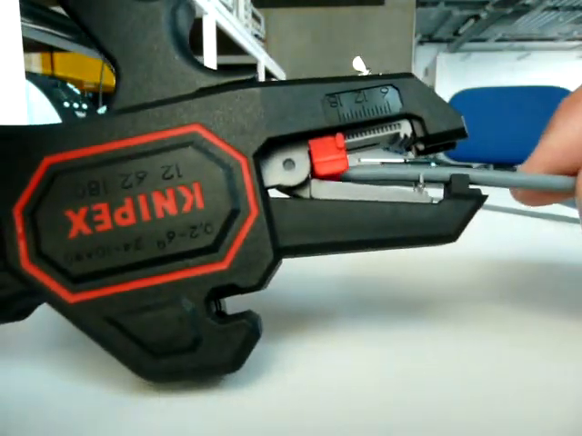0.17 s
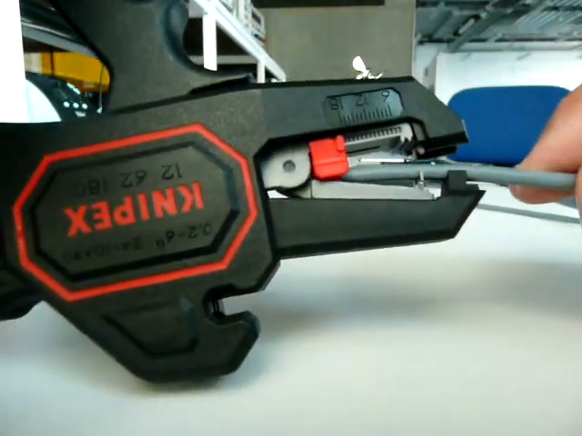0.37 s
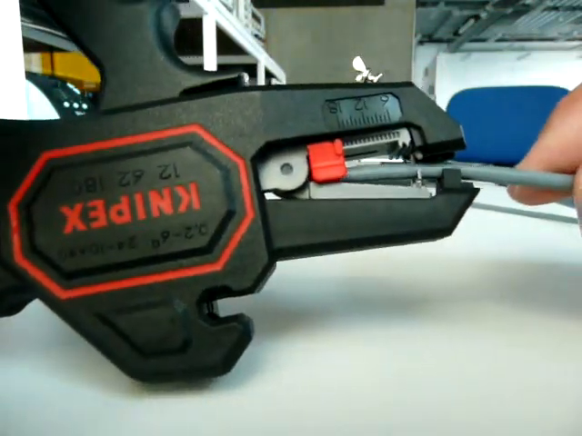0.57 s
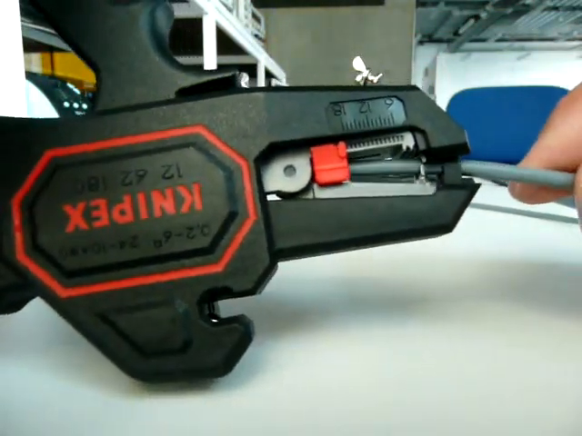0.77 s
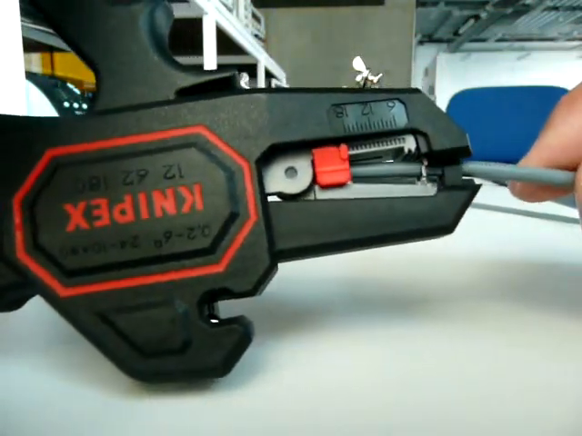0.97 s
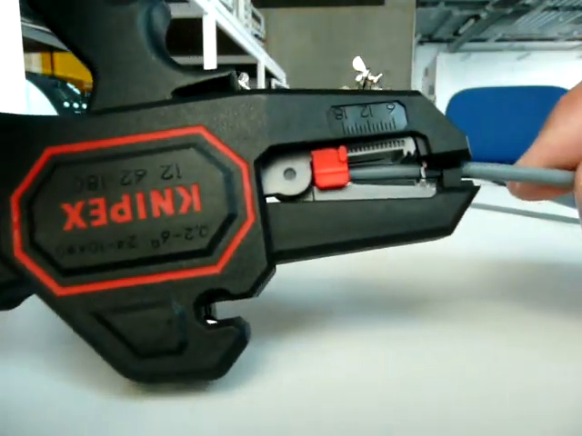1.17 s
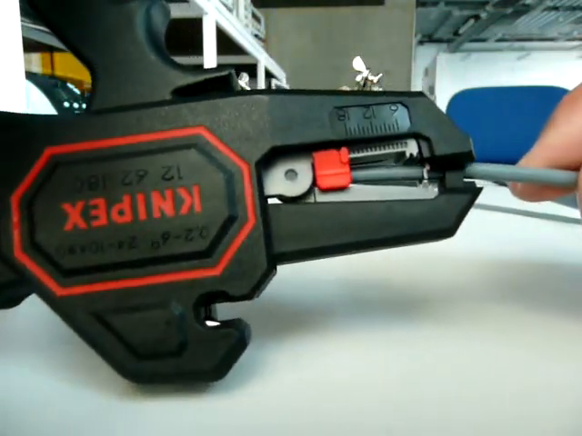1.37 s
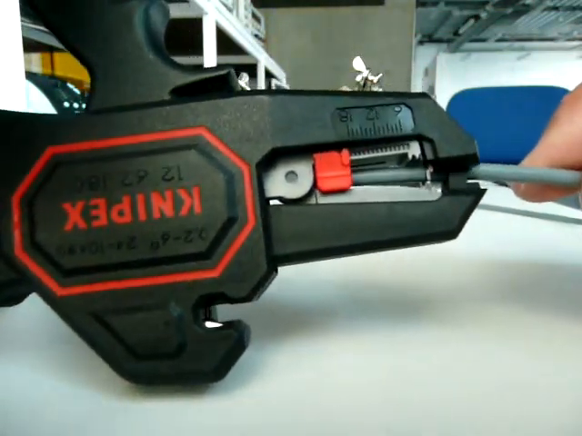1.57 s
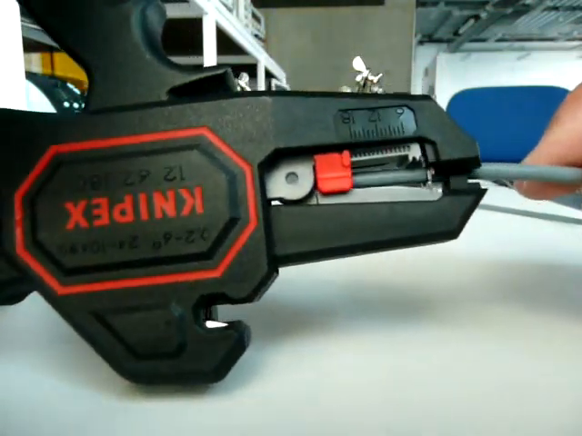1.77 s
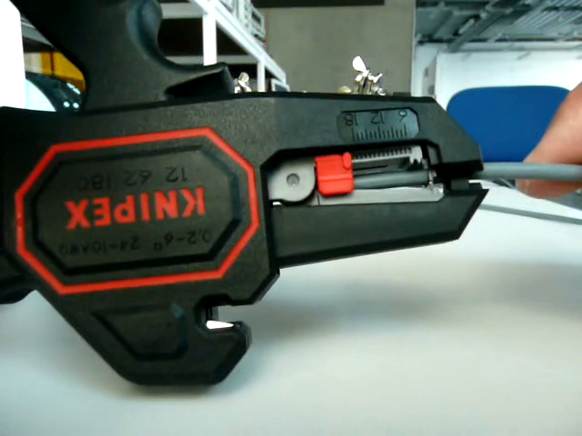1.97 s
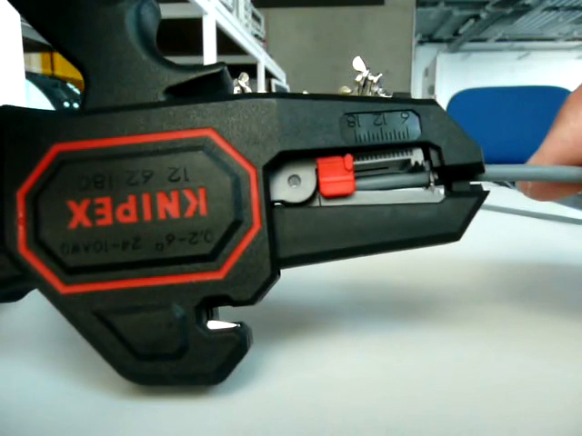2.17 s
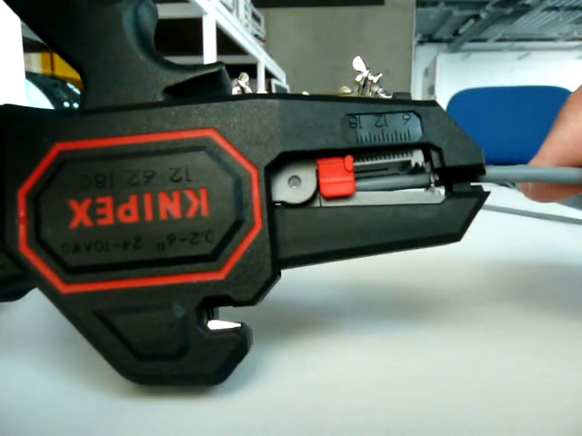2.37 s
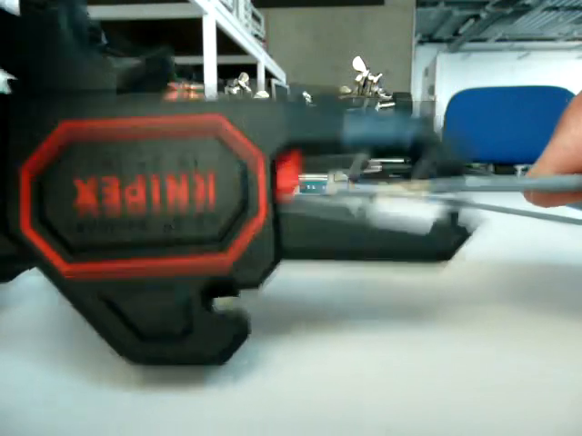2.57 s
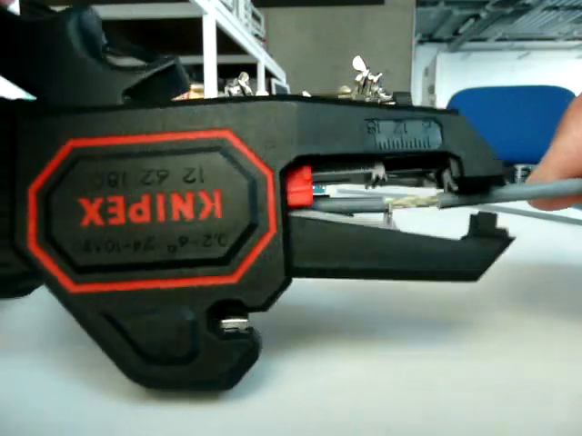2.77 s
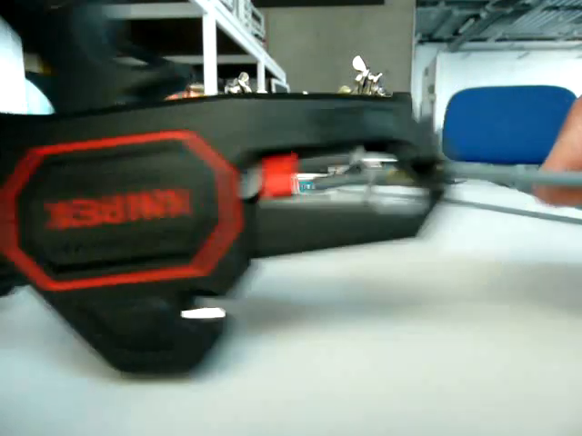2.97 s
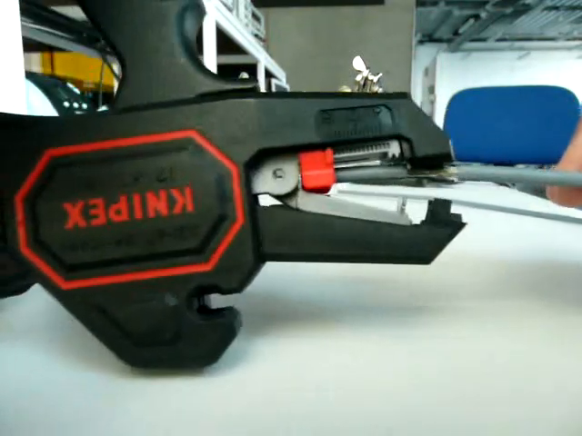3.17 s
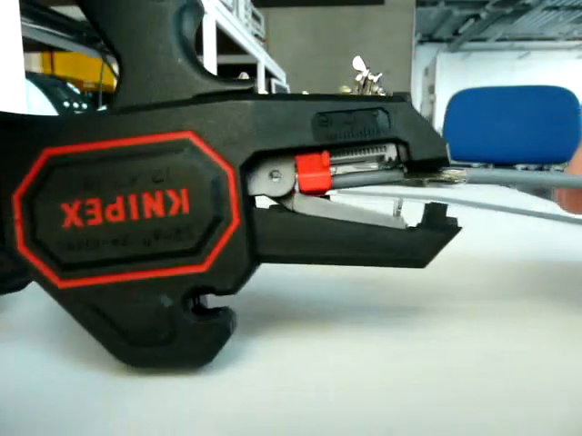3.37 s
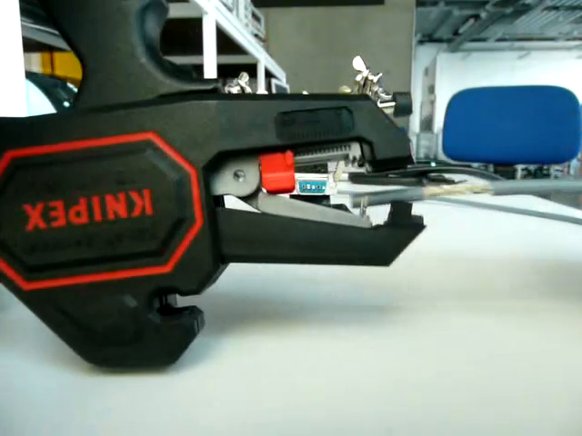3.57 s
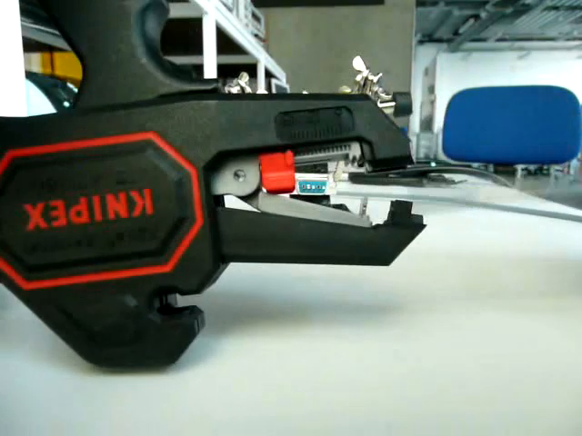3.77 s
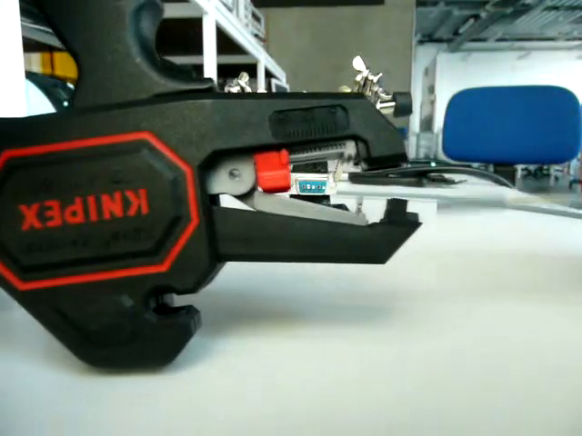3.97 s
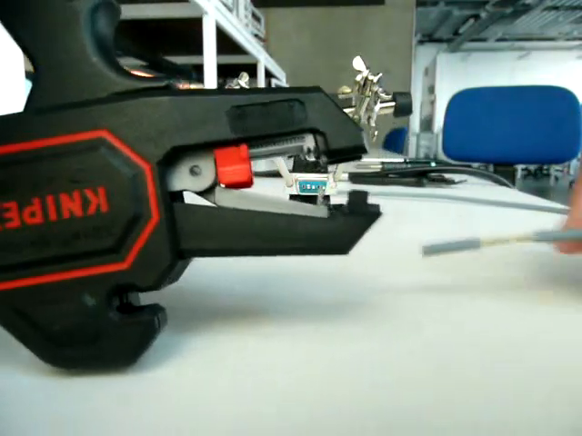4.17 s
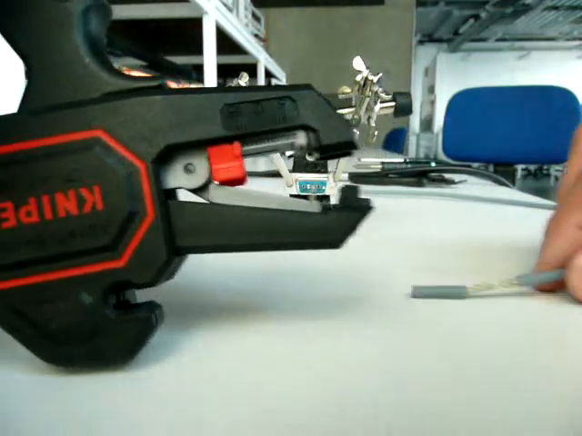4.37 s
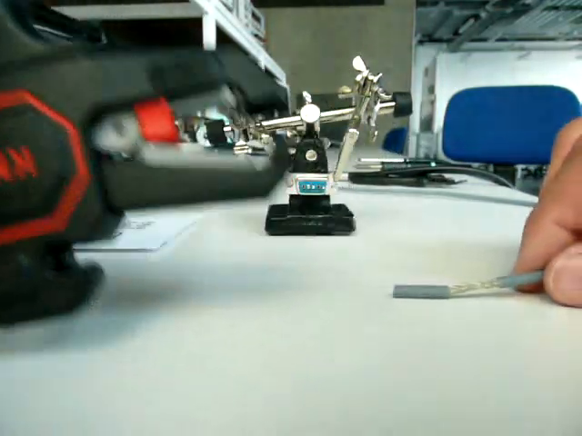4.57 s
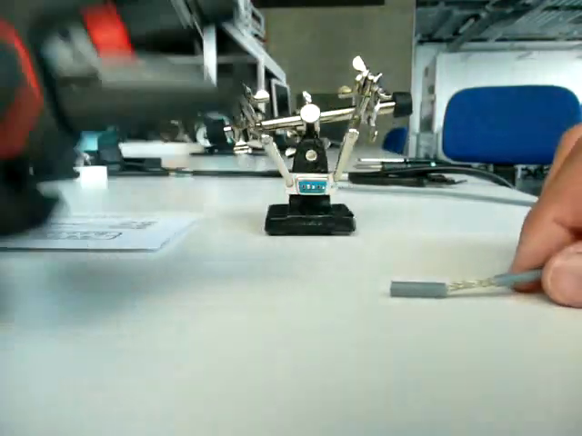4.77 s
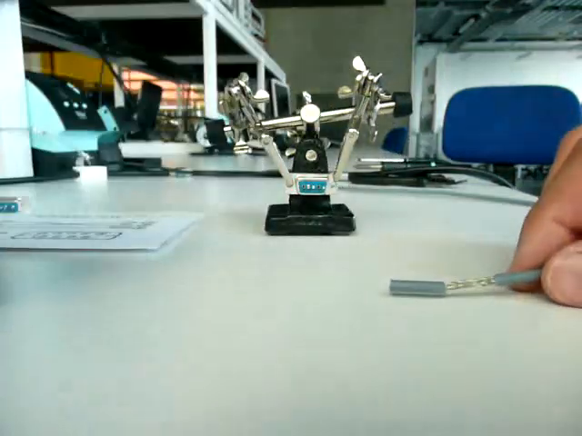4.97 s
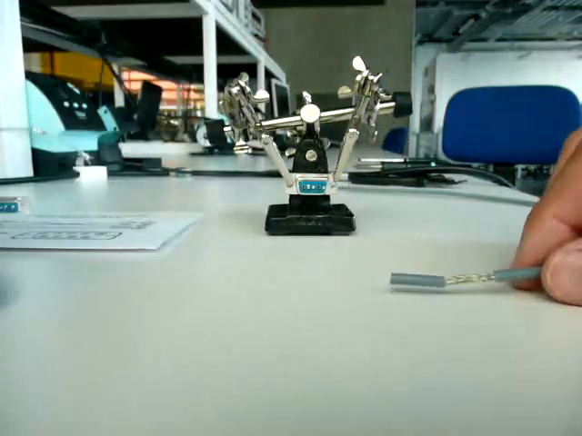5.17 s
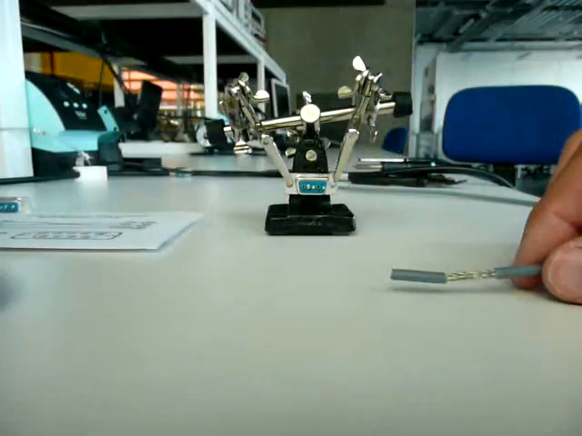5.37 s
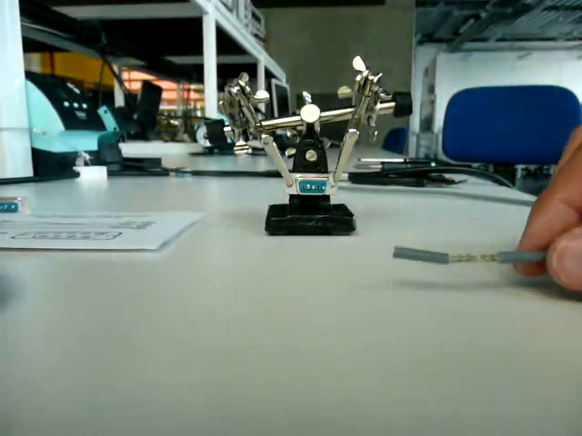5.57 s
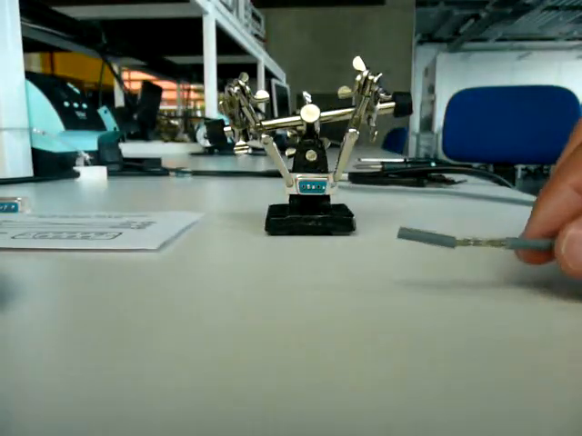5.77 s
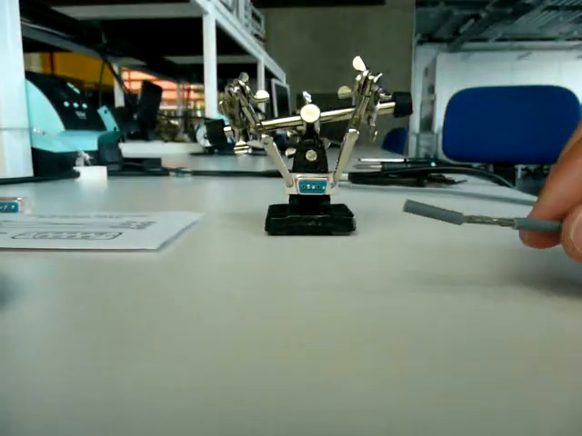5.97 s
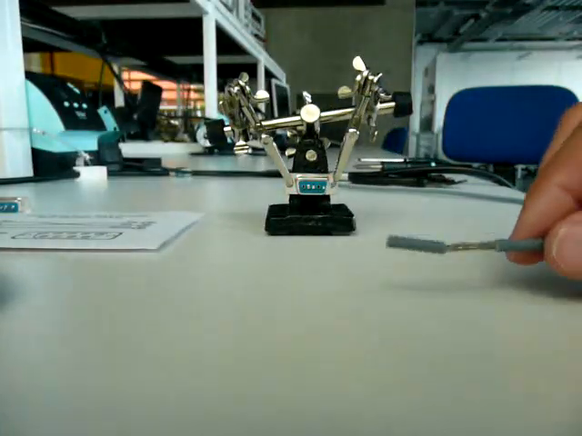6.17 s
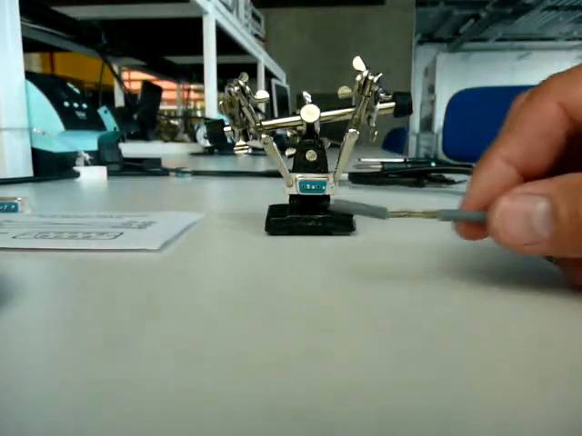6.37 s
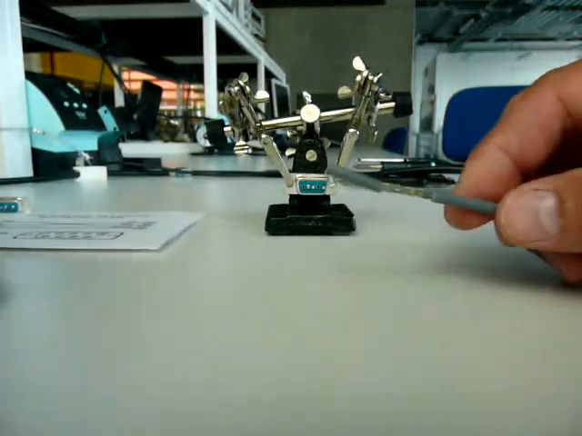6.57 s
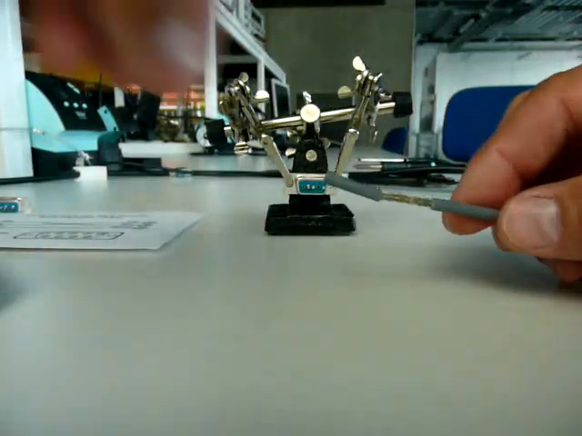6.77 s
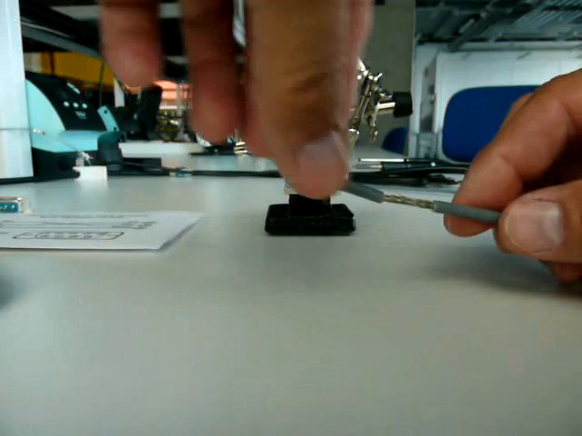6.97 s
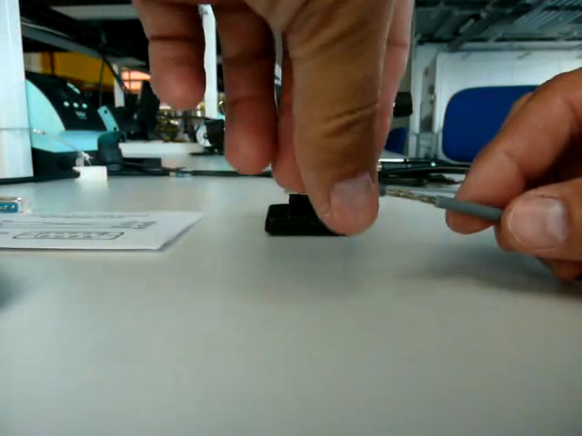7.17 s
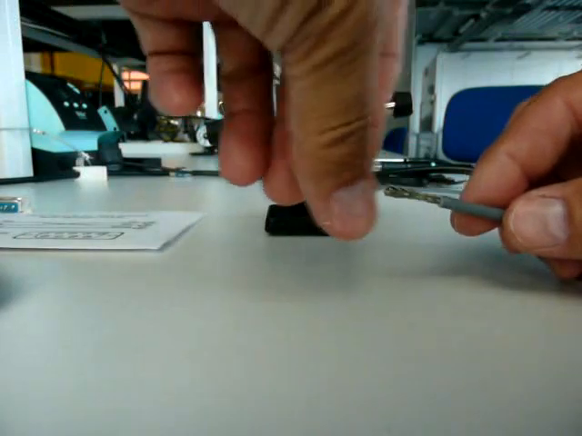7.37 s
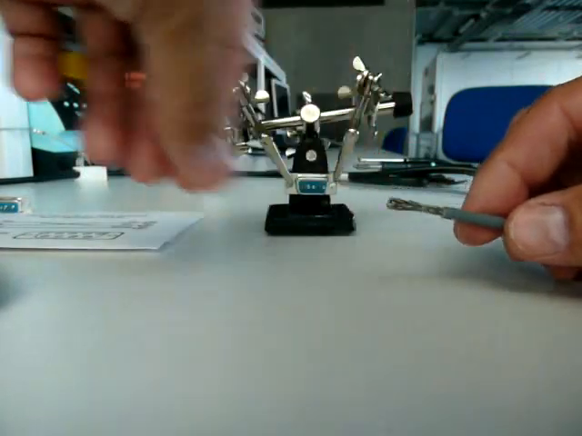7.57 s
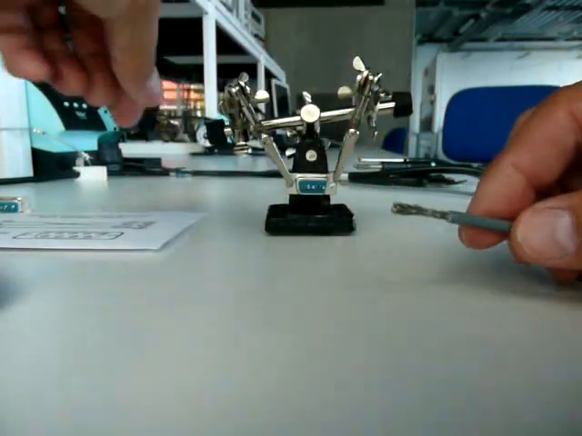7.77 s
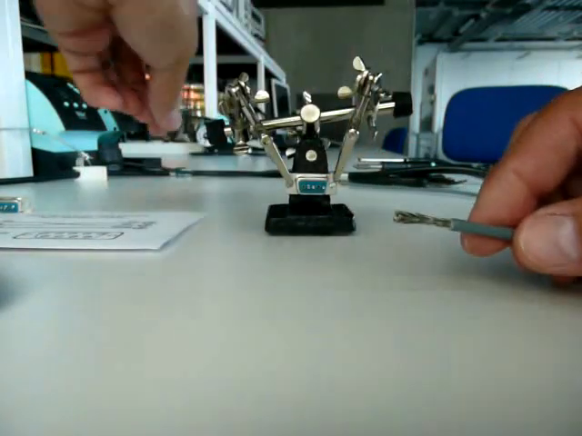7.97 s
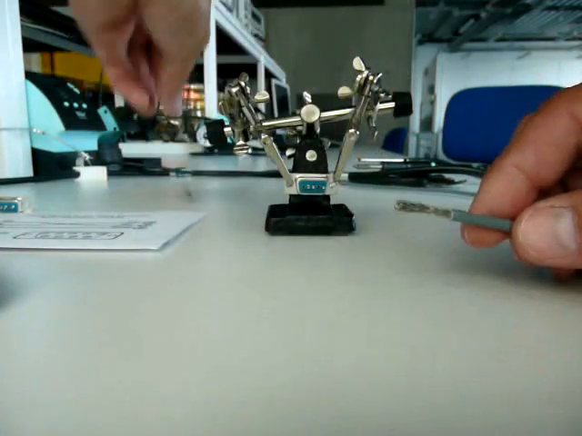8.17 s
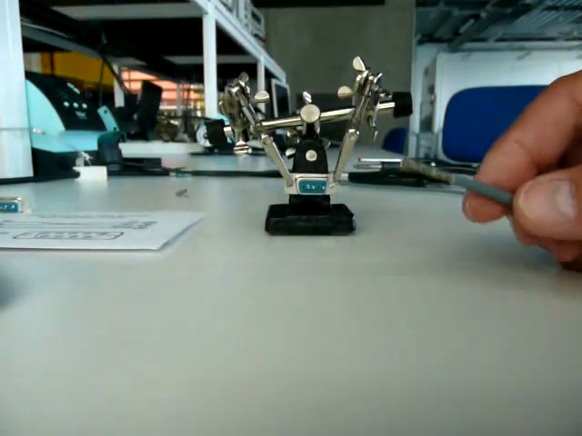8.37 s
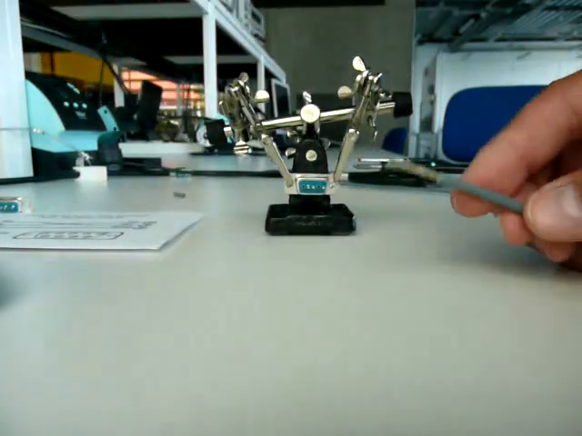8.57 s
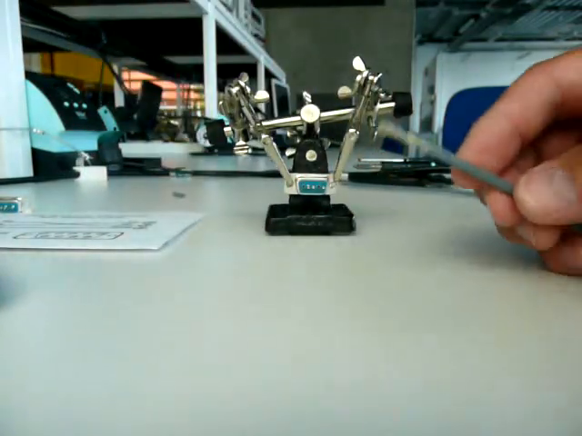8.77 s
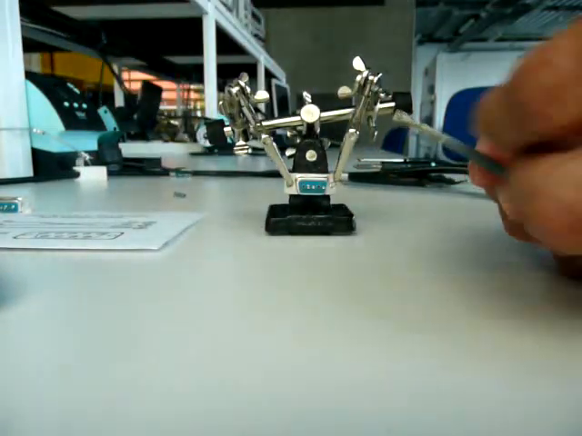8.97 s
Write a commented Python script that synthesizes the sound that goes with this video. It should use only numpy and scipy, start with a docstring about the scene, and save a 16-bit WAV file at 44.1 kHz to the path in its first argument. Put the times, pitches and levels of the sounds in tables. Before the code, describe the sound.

Over dull hiss and workshop hum with fast ticking, a plastic hand tool snaps loudly, rattles back, then a hard knock and faint bench taps.

```python
"""On a workbench, close to a small camera, a plastic wire stripper is squeezed: its jaws click, snap and spring back.
Clicks and sliding parts ring its plastic body in short decaying tones and filtered grit; its handle shudders.
Tool and cable knock and drag on the bench top, and the cable's loose end taps: pulses and grit through resonances.
Underneath lie workshop hum, made of shaped noise, and the camera's own faint ticking.
A coarse 8-bit converter adds hiss and dulls the treble."""
import sys
import numpy as np
from scipy import signal
from scipy.fft import rfft, irfft, next_fast_len
from scipy.io import wavfile
from scipy.ndimage import uniform_filter1d

SR = 44100
rng = np.random.default_rng(int(sys.argv[2]) if len(sys.argv) > 2 else 0)


def wav_record(signal):
    """Record a signal, one row per channel, as 16-bit PCM in the file named by sys.argv[1]."""
    frames = np.transpose(np.atleast_2d(signal))
    bounded = np.clip(frames, -1, 1)
    # unit amplitude maps onto the largest positive 16-bit level
    quanta = np.round(bounded * 32767).astype(np.int16)
    wavfile.write(sys.argv[1], SR, quanta)


N = 398196  # length [samples]

# rings of the plastic body: (frequency [Hz], time to fade 60 dB before stretching [s])
BODY_RINGS = [(980, 0.012), (1500, 0.0056), (1850, 0.011), (2700, 0.0057), (3250, 0.0038), (4000, 0.0029)]


def amp(db):
    """Gain of a level in dB."""
    return 10 ** (np.asarray(db) / 20)


def unit(x):
    """Scaled to rms 1."""
    return x / np.sqrt(np.mean(x ** 2) + 1e-20)


def along(points, hz):
    """Values between (Hz, value) points, on a log frequency axis."""
    point_hz, value = np.transpose(points)
    return np.interp(np.log(hz + 1), np.log(point_hz + 1), value)


def strokes(rows):
    """One gain curve per row: a straight rise, a hold, then an even fade in dB."""
    curves = np.zeros((len(rows), N + SR))
    t = np.arange(SR) / SR
    for curve, (start_s, rise_s, hold_s, db, fade, *_) in zip(curves, rows):
        rise = np.minimum(t / max(rise_s, .001), 1)
        faded_db = abs(fade) * np.maximum(t - rise_s - hold_s, 0)
        curve[round(start_s * SR):][:SR] = rise * amp(db - faded_db)
    return curves[:, :N]


def filtered(x, response):
    """x passed through a complex response of frequency, with silence padded behind it."""
    m = next_fast_len(N + SR // 2)
    spectrum = rfft(x, m) * response(np.fft.rfftfreq(m, 1 / SR))
    return irfft(spectrum, m)[..., :N]


def resonance(hz, width_hz):
    """The causal response of one mode, peak 1."""
    return lambda f: 1j * f * width_hz / (hz * hz - f * f + 1j * f * width_hz)


def grit(spiky_db):
    """Noise of rms 1 whose strength jumps every two milliseconds: many tiny contacts."""
    hold = 88  # samples
    strength = np.repeat(amp(spiky_db * rng.standard_normal(N // hold + 1)), hold)[:N]
    return unit(strength * rng.standard_normal(N))


def workshop():
    """Steady hum and air noise: shaped noise, slightly patchy over time and frequency."""
    # colour of the workshop air: (frequency [Hz], relative level per Hz [dB])
    hum = [(15, -32), (35, -12.5), (69, -16.5), (98, -0.5), (122, -7), (145, -2.5), (205, -1), (300, -3),
           (365, -7.5), (700, -9.5), (830, -12.5), (1000, -16.5), (1500, -17.5), (1850, -12), (2200, -20),
           (3500, -24), (5500, -29)]
    hum_db = -47.5  # rms
    z = signal.stft(rng.standard_normal(N + 512), nperseg=512)[2]
    patches = uniform_filter1d(rng.standard_normal(z.shape), 4, 0)  # smoothed across frequency
    patches = uniform_filter1d(patches, 12, 1)  # and time
    air = signal.istft(z * amp(1.2 * unit(patches)), nperseg=512)[1][:N]
    return amp(hum_db) * unit(filtered(air, lambda hz: amp(along(hum, hz))))


def camera_ticks():
    """The camera ticks once a frame, at uneven strength, in a resonance of its case."""
    frame_rate, first_tick_s = 29.97, .0245  # frames per second, s
    s = np.arange(first_tick_s, N / SR - .01, 1 / frame_rate)
    level_db = -15.5 + rng.normal(0, 3.5, len(s))
    pulses = np.bincount(np.round(s * SR).astype(int), amp(level_db), N)
    return filtered(pulses, resonance(1850, 330))


def bench():
    """A hard contact reaches the high modes of the bench top, a heavy one the low modes."""
    # knocks: (time [s], relative level [dB], hardness [dB per octave above 650 Hz],
    # weight [dB per octave below 420 Hz])
    knock_rows = [(.6355, -23, -3, -1), (1.149, -40, -2.5, -1), (1.24, -43, -6, 5), (1.472, -20, 0, -1),
                  (1.4855, -16.5, -8, -1), (2.6161, 6.5, -3, -8), (2.956, -23, -4.5, -8),
                  (3.012, -24, 3, 9), (3.046, -21, -1, 4), (3.469, -34, -1, 3), (4.09, -39, 5, -4),
                  (4.127, -37, 0, -2), (4.38, -40, 1.5, -1), (4.429, -25, -0.5, -1),
                  (4.751, -30.5, 4.5, -3), (4.952, -39.5, 2, -11), (4.994, -32.5, 3, -8),
                  (5.847, -19.5, -1, -2), (5.877, -23, -0.5, -6), (6.106, -30.5, 3, 1), (6.389, -22, 5, 2),
                  (6.4533, 1.5, 5.5, -6), (6.795, -28.5, 1.5, -7), (8.206, -27, 14.5, -6),
                  (8.214, -26, 11, -14), (8.848, -17.5, 10, -8.5), (8.948, -36, 4, 5),
                  (8.978, -30.5, 7, -2.5)]
    # shaking after a blow and while tool or cable drags: (time [s], rise [s], hold [s],
    # relative level [dB], fade [dB/s], hardness and weight [as for knocks])
    drag_rows = [(1.477, .003, .001, -34.5, 345, -18, 3), (2.618, .003, 0.11, -18, 600, -23.5, 0.5),
                 (2.73, .03, 0.046, -31, 120, -25.5, 6.5), (2.909, 0.033, 0.057, -33, 400, -7, 7.5),
                 (3.05, 0.016, 0.039, -45.5, 233, -16, 5.5), (3.47, .003, .03, -41, 126, -3, 1.5),
                 (4.049, 0.04, .001, -42, 260, 0, 3), (4.332, 0.0037, .001, -42, 90, 2.5, 1.5),
                 (5.55, 0.35, .001, -45.5, 100, -0.5, -5), (5.98, .16, 0.13, -42.5, 167, -1.5, -2),
                 (6.389, 0.0039, 0.02, -39.5, 600, -13, 0.5), (6.456, .003, .025, -21.5, 232, 1.5, 3),
                 (6.489, 0.026, .04, -32.5, 100, 0, 4), (8.149, .07, .001, -39.5, 170, 3.5, -0.5),
                 (8.28, .12, 0.11, -43, 99, -4, -9), (8.5, .11, .09, -39, 108.5, -2.5, -7),
                 (8.848, .003, 0.0011, -31, 231, 5.5, -11), (8.92, .04, .1, -39.5, 100, -2, -5.5)]
    # modes of the bench top: (frequency [Hz], width [Hz], level [dB])
    bench_modes = [(145.4, 22, -4), (259.5, 27, 0), (338.6, 34, -0.5), (401.6, 30, -2), (462, 35, 2),
                   (552, 40, -1.5), (694, 35, -0.5), (752, 45, -0.5), (854, 60, -2.5), (1058.3, 55, -2.5),
                   (1156, 94, -8), (1300, 150, -7)]
    middling_ms, shorter_per_db = .55, .23  # contact time at hardness 0, and its log drop per unit of hardness

    drag_hard, drag_heavy = np.transpose(drag_rows)[5:]
    shake = strokes(drag_rows) * grit(spiky_db=2.0)

    s, level_db, hard, heavy = np.transpose(knock_rows)
    contact_ms = np.clip(middling_ms * np.exp(-shorter_per_db * hard), .1, 3)
    lag = np.arange(160)  # samples
    phase = np.clip(lag / (contact_ms[:, None] * SR / 1000), 0, 1)
    push = np.sin(np.pi * phase) ** 2
    push /= push.sum(axis=1, keepdims=True)  # a longer contact spreads the same impulse and sounds duller
    at = np.round(s * SR).astype(int)[:, None] + lag
    scatter_db = rng.normal(0, 1.7, (len(s), len(bench_modes)))

    out = np.zeros(N)
    for k, (hz, width_hz, db) in enumerate(bench_modes):
        above, below = max(np.log2(hz / 650), 0), max(np.log2(420 / hz), 0)  # octaves
        strength = amp(level_db + hard * above + heavy * below + scatter_db[:, k] + 28.5)
        blows = np.bincount(at.ravel(), (strength[:, None] * push).ravel(), N)
        drag_gain = amp(drag_hard * above + drag_heavy * below + 14.0)
        rubbing = (-1) ** k * drag_gain @ shake
        mode = lambda f: resonance(hz, width_hz)(f) / (1 + 1j * f / (2 * hz)) ** 2  # little leaks above the mode
        out += amp(db) * filtered(rubbing - blows, mode)  # a blow starts all modes together: one thud
    return out


def tool_clicks():
    """Each click is a bright crack of contact, then the body's rings, longer for a softer click."""
    # clicks inside the tool: (time [s], relative level of the jaw [dB], of the lever [dB], of the latch [dB])
    click_rows = [(.639, -52, -37, -50.5), (1.4703, -26, -19, -27.5), (2.5631, 1, -22, -24.5),
                  (2.5706, 2.5, -4, 7), (2.575, -39, -32, -9), (2.5818, -32, -38, -26),
                  (2.9916, -16, -16.5, -34), (3.0005, -28, -38, -24), (3.0188, -20, -21, -20),
                  (3.042, -26, -19, -18), (3.0466, -20, -12, 0.5), (3.0491, -6.5, -30, -18),
                  (3.0645, -34, -27, -34), (3.107, -54, -20, -39), (3.467, -50, -37, -36),
                  (3.526, -53, -39, -60), (3.55, -58, -38.5, -55), (4.229, -44, -49, -64),
                  (4.381, -38, -52, -56), (4.429, -50.5, -42, -58), (5.847, -36.5, -41.5, -55),
                  (5.877, -37.5, -38.5, -51), (6.051, -47, -44.5, -51), (6.153, -36.5, -41, -52),
                  (6.222, -46, -45, -51), (6.3884, -24.5, -27.5, -40), (6.4534, 3, -6, -1.5),
                  (6.477, -36, -22, -28), (6.491, -26, -47, -50), (8.2067, -37, -40, -31),
                  (8.214, -34, -35, -40), (8.3067, -40, -41, -48), (8.378, -40, -46, -43),
                  (8.8493, -29.5, -38, -35.5), (8.862, -34, -37, -37.5)]
    # reach of jaw, lever and latch, a row each: (level at each of the six body rings [dB])
    reach_db = [(-28.5, 0.9, -25, -9, -25.5, -25), (-22.5, -31, -2.55, -12.5, -35, -36),
                (-21.5, -33, -22.5, -12.5, 1.7, -2.5)]
    stretch_at_0_db, longer_per_db = 1.068, .0729  # ring time factor, and its growth per dB softer
    out, t = np.zeros(N + SR), np.arange(SR // 10) / SR
    rise = 1 - np.exp(-t / .00048)
    for s, *part_db in click_rows:
        loudest_db = max(part_db)
        bright_noise = np.diff(rng.standard_normal(len(t) + 1))
        click = amp(loudest_db - 5 - 60 * t / .028) * bright_noise
        stretch = stretch_at_0_db - longer_per_db * loudest_db
        ring_gains = amp(part_db) @ amp(reach_db)
        for gain, (hz, t60) in zip(ring_gains, BODY_RINGS):
            fade = amp(5 - 60 * t / (t60 * stretch))
            detuned_hz = hz * rng.normal(1, .028)
            click += gain * fade * rise * np.sin(2 * np.pi * detuned_hz * t)
        out[round(s * SR):][:len(t)] += click
    return out[:N]


def tool_sliding():
    """Parts sliding in the tool and fingers on its grip: grit sounds the four middle rings of the body."""
    # slides: (time [s], rise [s], hold [s], relative level [dB], fade [dB/s],
    # upper two rings against lower two [dB])
    slide_rows = [(1.467, 0.002, .001, -40.5, 305, -11.5), (2.562, 0.0016, 0.0011, -27, 907, -3),
                  (2.583, 0.0073, .033, -42.5, 900, 1), (2.623, 0.056, 0.049, -52.5, 110, 2.5),
                  (2.933, 0.094, .001, -53, 500, 0), (2.991, 0.0036, 0.031, -36, 1500, -9),
                  (3.043, 0.0055, 0.057, -43.5, 501, -5), (3.111, 0.017, .06, -59.5, 200, -5),
                  (3.463, 0.082, .001, -53.5, 300, -13), (4.297, .06, 0.058, -58, 203, -8),
                  (5.982, 0.094, 0.11, -55.5, 204, -10), (6.202, .1, .04, -52, 250, -8.5),
                  (6.388, 0.016, .001, -52, 404, -13), (6.457, 0.018, 0.00065, -33, 410, -13),
                  (6.484, 0.024, 0.043, -46, 108, -7), (6.73, .04, .14, -50.5, 301, -22.5),
                  (8.209, 0.0026, 0.00074, -36.5, 908, -5.5), (8.305, .15, 0.23, -59.5, 27, -8),
                  (8.85, 0.0023, .001, -44.5, 165.5, -4)]
    gain, high_db = strokes(slide_rows), np.transpose(slide_rows)[5]
    rub = []
    for hz, t60 in BODY_RINGS[1:5]:
        rub.append(unit(filtered(grit(spiky_db=4.0), lambda f: resonance(hz, 3.0 / t60)(f) ** 2)))
    low = gain.sum(axis=0) * (amp(-3.5) * rub[0] + rub[1])
    high = amp(high_db) @ gain * (rub[2] + rub[3])
    return low + high


def handle():
    """The long handle shudders after the jaws move: uneven small contacts keep one low mode going."""
    # shudders: (time [s], rise [s], hold [s], level [dB], fade [dB/s])
    shudder_rows = [(1.473, 0.011, 0.0013, -33.5, 272), (2.99, 0.017, .001, -33, 351),
                    (3.04, 0.032, 0.047, -41.5, 505), (3.47, 0.023, 0.026, -44.5, 180),
                    (4.06, 0.029, .001, -48.5, 227)]
    # the handle's mode: (frequency [Hz], width [Hz])
    hz, width_hz = (345, 60)
    mode = lambda f: resonance(hz, width_hz)(f) * resonance(hz, 250)(f)
    shaking = unit(filtered(grit(spiky_db=2.5), mode))
    return strokes(shudder_rows).sum(axis=0) * shaking


def taps():
    """Light taps of the cable's loose end each ring three hollow modes at fresh strengths."""
    # taps: (time [s], relative level [dB])
    tap_rows = [(5.629, -40.5), (5.664, -37), (5.757, -34.5), (5.824, -35), (5.915, -36), (6.051, -35),
                (6.134, -34), (6.222, -33.5), (6.263, -34.5), (6.289, -43), (6.957, -31.5), (6.995, -38.5),
                (7.126, -33.5), (7.223, -33), (7.3, -33), (7.374, -35), (7.481, -29.5), (7.557, -31),
                (7.632, -34), (7.705, -38.5), (8.001, -34), (8.147, -32), (8.176, -35), (8.299, -34),
                (8.364, -33), (8.406, -35.5), (8.444, -33), (8.48, -35.5), (8.545, -32), (8.582, -33),
                (8.619, -35.5), (8.664, -35), (8.754, -36), (8.798, -34)]
    # what the taps ring: (frequency [Hz], width [Hz], relative level [dB])
    hollow_modes = [(468, 44, 0), (704, 31, 0), (1150, 90, 3)]
    # top mode against the lower two: (time [s], level [dB])
    top_balance = [(5.9, -17), (6.1, -12), (7.6, -13), (8.1, -8.5), (8.55, -7.5), (8.65, -12)]
    s, low_db = np.transpose(tap_rows)
    top_db = low_db + np.interp(s, *np.transpose(top_balance))
    scatter_db = rng.normal(0, 1.5, (len(s), len(hollow_modes)))
    at = np.round(s * SR).astype(int)
    out = np.zeros(N)
    for k, ((hz, width_hz, db), level_db) in enumerate(zip(hollow_modes, (low_db, low_db, top_db))):
        blows = np.bincount(at, amp(level_db + db + 40 + scatter_db[:, k]), N)
        mode = lambda f: resonance(hz, width_hz)(f) * resonance(hz, hz)(f)
        out += (-1) ** k * filtered(blows, mode)
    return out


def scene():
    """Tool, cable and bench close by, over the steady floor, in one channel."""
    floor = workshop() + camera_ticks()
    close = bench() + tool_clicks() + tool_sliding() + handle() + taps()
    return (floor + close)[None]


def record(dry):
    """A slow 8-bit converter with an offset: its coarse steps make the hiss; peaks clip again after smoothing."""
    # smoothing filter after the converter: (frequency [Hz], gain [dB])
    smoothing = [(3300, 0), (3900, -4.5), (4300, -11), (4700, -19.5), (5100, -37.5), (5500, -120)]
    converter_hz, top_hz = 11025, 16300  # sample rate, final treble limit
    offset, step = -.0231, .00527  # full scale 1
    top, knee = .69, 14  # last clipping: ceiling, sharpness
    every = round(SR / converter_hz)
    samples = filtered(dry, lambda hz: hz < converter_hz / 2)[:, ::every] + offset
    stepped = step * np.clip(np.round(samples / step), -128, 127)
    pulses = np.zeros_like(dry)
    pulses[:, ::every] = every * (stepped - offset)
    smooth = filtered(pulses, lambda hz: amp(along(smoothing, hz))) + offset
    clipped = smooth / (1 + np.abs(smooth / top) ** knee) ** (1 / knee)
    return offset + filtered(clipped - offset, lambda hz: hz < top_hz)


dry = scene()
out = record(dry)
wav_record(out)
```